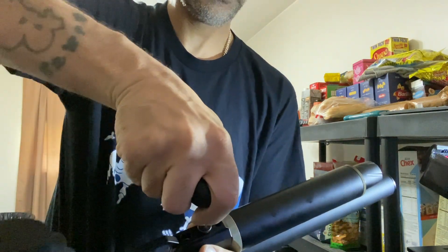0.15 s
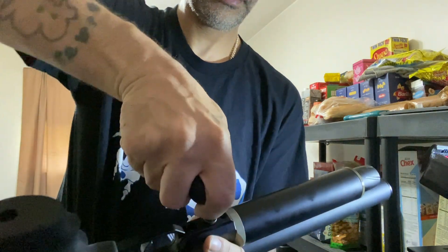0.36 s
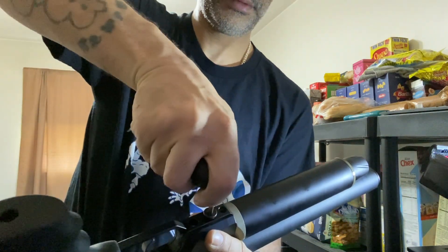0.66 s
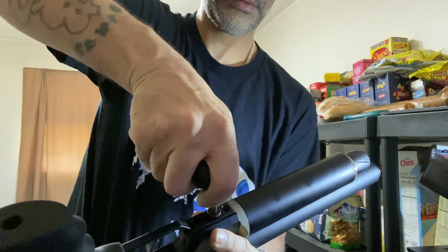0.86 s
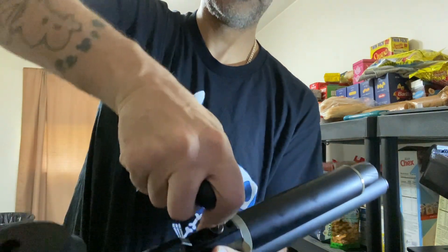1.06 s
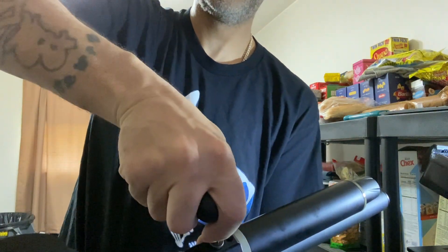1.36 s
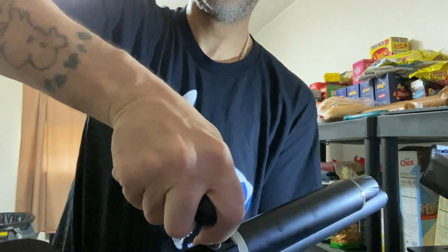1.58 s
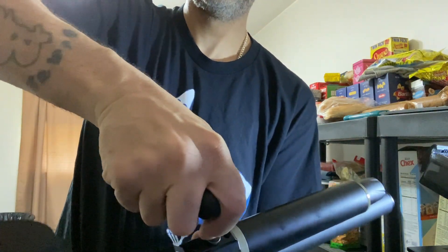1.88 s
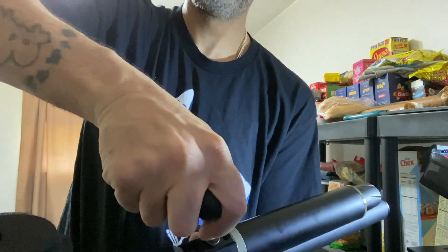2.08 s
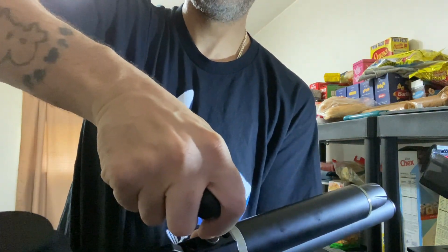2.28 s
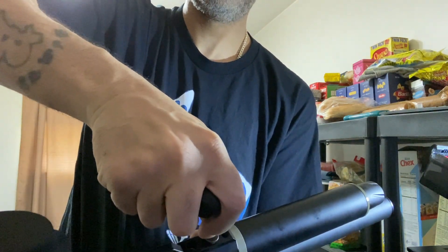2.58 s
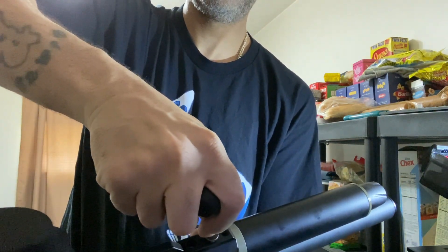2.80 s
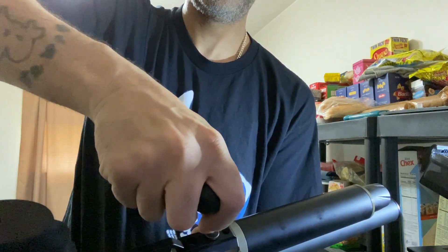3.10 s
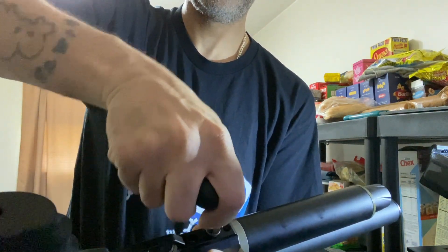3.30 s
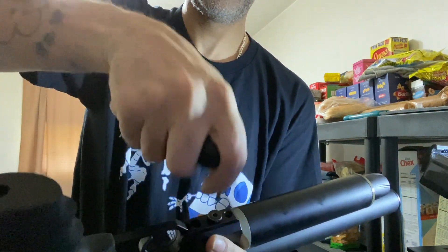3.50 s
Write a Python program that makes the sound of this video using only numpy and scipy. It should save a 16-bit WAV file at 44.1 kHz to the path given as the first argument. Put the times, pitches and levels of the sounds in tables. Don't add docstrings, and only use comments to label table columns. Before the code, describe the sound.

Compressed air bursts from a tank's bleed screw in a loud, steady, bright hiss to the end, after faint ticks and two sharp metallic knocks from a hand tool, in a quiet kitchen, miked close.

```python
import sys
import numpy as np
from scipy import signal
from scipy.fft import rfft, irfft
from scipy.io import wavfile
from scipy.ndimage import uniform_filter1d

SR = 44100
rng = np.random.default_rng(int(sys.argv[2]) if len(sys.argv) > 2 else 0)


def rack_gain(trim_db):
    fader = np.asarray(trim_db, float)
    return 10 ** (fader / 20)


def wav_out(sig):
    wavfile.write(sys.argv[1], SR, np.round(np.clip(np.atleast_2d(sig).T, -1, 1) * 32767).astype(np.int16))


N = 160965
FRAMES = N // 256 + 5
BIN_HZ = np.fft.rfftfreq(1024, 1 / SR)[:, None]


def evened(x):
    return x / np.sqrt(np.mean(x ** 2) + 1e-20)


def read(points, hz):
    f, value = np.transpose(points)
    return np.interp(np.log(hz + 1), np.log(f + 1), value)


def timeline(s, value, **ends):
    return np.interp(np.arange(N) / SR, s, value, **ends)


def add(mix, s, sound):
    part = mix[max(round(s * SR), 0):][:len(sound)]
    part += sound[:len(part)]


def noise(gain):
    a, b = rng.standard_normal((gain.shape[1], gain.shape[0], 2)).T
    return signal.istft(gain * (a + 1j * b), nperseg=1024, noverlap=768)[1][:N]


def drift(size):
    once = uniform_filter1d(rng.standard_normal(N), size=size)
    return evened(uniform_filter1d(once, size=size))


def patchwork(bins, frames):
    x = uniform_filter1d(rng.standard_normal((FRAMES, 513)), size=bins, axis=1)
    return evened(uniform_filter1d(x, size=frames, axis=0)).T


def resonance(hz, f, width):
    return 1 / (1 + (2 * (hz - f) / width) ** 2)


def kitchen(x):
    # f/Hz, t60/s
    decay = [(200, 1), (1000, 0.24), (4000, 0.25), (9000, 0.22), (15000, 0.22)]
    at = np.arange(200, SR // 2, 20)
    taps = np.zeros(SR)
    taps[at + rng.integers(0, 20, len(at))] = rng.choice([-1., 1.], len(at))
    hz, t, z = signal.stft(taps, SR, nperseg=256)
    tail = signal.istft(z * rack_gain(-60 * t / read(decay, hz)[:, None]), SR, nperseg=256)[1]
    return signal.fftconvolve(x, tail / np.linalg.norm(tail))[:N]


def air():
    # f/Hz, level/dB per Hz
    room_colour = [(35, -24), (58, -12.5), (130, -6), (200, -12), (400, -20.5), (1100, -32.5), (6000, -46),
                   (14000, -52)]
    # t/s, level/dB rms
    rustle = [(0, -48.5), (.07, -63), (.35, -66), (.45, -59), (.75, -55.5), (.9, -66.5), (1.2, -49.5),
              (1.45, -62), (1.8, -49.5)]
    # f/Hz, level/dB per Hz
    rustle_colour = [(300, -12), (1500, -5), (3000, -6), (4000, -8.5), (7000, -8.5), (12000, -20.5),
                     (15000, -38)]
    # f/Hz, width/Hz, level/dB rms
    whines = [(2700, 800, -66), (5500, 500, -75)]
    # t/s, length/s, f/Hz, width/Hz, level/dB rms
    squeaks = [(.2, 0.17, 7900, 300, -66), (.36, .2, 2700, 500, -63), (.7, 0.21, 2400, 700, -59),
               (.68, .15, 5300, 400, -72)]
    room_db, top_hz = -45.5, 14700
    patch_db = 1.8 * patchwork(20, 16)
    x = rack_gain(room_db) * evened(noise(rack_gain(read(room_colour, BIN_HZ) + patch_db)))
    hand = evened(noise(rack_gain(read(rustle_colour, BIN_HZ) + patch_db)))
    x += rack_gain(timeline(*np.transpose(rustle))) * hand
    for f, width, db in whines:
        x += rack_gain(db) * evened(noise(rack_gain(patch_db) * resonance(BIN_HZ, f, width)))
    for s, length, f, width, db in squeaks:
        window = np.hanning(round(length * SR))
        rub = evened(noise(np.ones(60) * resonance(BIN_HZ, f, width)))
        add(x, s, rack_gain(db) * window * rub[1024:][:len(window)])
    return signal.sosfilt(signal.cheby1(10, 1, top_hz, fs=SR, output="sos"), x)


def fridge():
    # f/Hz, level/dB rms
    hum = [(60, -47), (120, -53.5), (180, -41.5), (240.5, -57), (540, -61)]
    fan_hz, fan_db, waver_db, beat_dip_s = 167.4, -46.5, .8, .035
    t = np.arange(N) / SR - beat_dip_s
    x = np.zeros(N)
    for hz, db in hum:
        x += rack_gain(db + waver_db * drift(size=4000)) * np.cos(2 * np.pi * hz * t)
    x -= rack_gain(fan_db + waver_db * drift(size=4000)) * np.cos(2 * np.pi * fan_hz * t)
    return np.sqrt(2) * x


def splits():
    # t/s, low f/Hz, high f/Hz, level/dB rms
    moments = [(2.18, 8300, 10200, -17), (2.785, 5600, 6900, -28), (2.876, 4130, 5730, -22)]
    length_s = .045
    x = np.zeros(N)
    window = np.hanning(round(length_s * SR))
    for s, lo_hz, hi_hz, db in moments:
        band = evened(noise((BIN_HZ > lo_hz) * (BIN_HZ < hi_hz) * np.ones(40)))
        add(x, s - length_s / 2, rack_gain(db) * window * band[1024:][:len(window)])
    return np.array([x, -x])


def knock(peak_db, hz, ms, octaves):
    # f/Hz, level/dB, t60/s
    modes = [(406, 4, 0.014), (650, 9, 0.018), (1430, 5, 0.014), (1750, 2, .01), (2080, 5, 0.013),
             (2560, 4, .009), (3130, 7, 0.015), (3600, 4, 0.007), (4670, 3, 0.007), (5580, 8, 0.01),
             (7600, 8, 0.009), (8800, 4, 0.005), (9900, 4, .005), (11500, 4, 0.004)]
    rise_share, scatter_db, detune = .4, 2, .015
    body_share, echo_body_share = .55, .3
    skirt_db, skirt_low_hz, skirt_top_hz = -15, 450, 3500
    t, f = np.arange(4096) / SR, np.fft.rfftfreq(8192, 1 / SR)
    u = t * 1000 / ms
    envelope = np.minimum(u / rise_share, 1) ** 2 * np.exp(-3 * np.maximum(u - rise_share, 0))
    contact = rng.standard_normal(len(t)) * envelope
    ring = np.zeros(len(t))
    for (mode, db, t60), (a, b) in zip(modes, rng.standard_normal((len(modes), 2))):
        decay = rack_gain(db + scatter_db * a - 60 * t / t60)
        ring += decay * np.sin(2 * np.pi * mode * (1 + detune * b) * t)
    colour = 1 / (1 + (np.log2((f + 20) / hz) / octaves) ** 2) ** 2
    colour += rack_gain(skirt_db) * f / (f + skirt_low_hz) / (1 + (f / skirt_top_hz) ** 2)
    colour /= 1 + (f / 11000) ** 4
    mirrored = np.r_[colour, colour[-2:0:-1]]
    causal = np.exp(np.conj(signal.hilbert(np.log(mirrored))))[:len(f)]
    rung = evened(signal.fftconvolve(contact, ring)[:len(t)])
    direct = body_share * rung + (1 - body_share) * evened(contact)
    to_room = echo_body_share * evened(ring) + (1 - echo_body_share) * evened(t == 0)
    x, wide = irfft(rfft([direct, to_room], 2 * len(t)) * causal)[:, :len(t)]
    return rack_gain(peak_db) / abs(x).max() * np.array([x, evened(wide) * x.std()]).T


def tool():
    # t/s, peak level/dB, colour f/Hz, length/ms, colour width/octaves
    knocks = [(1.0575, -18.5, 8800, 3.7, .9), (1.0608, -16, 6000, 2.1, 1.1), (1.064, -23, 2500, 14, 1.4),
              (1.0736, -17, 7200, 6.7, 0.73), (1.0765, -22, 13000, 5, .5), (1.0755, -9, 3100, 6.3, .6),
              (1.0771, -9, 5600, 4.6, 0.66), (1.08, -16, 1420, 7.4, 0.91), (1.082, -7.5, 8150, 2.6, .8),
              (1.0832, -5.5, 3180, 3.3, 0.71), (1.0906, -9.5, 2400, 3.3, 1.1),
              (1.1045, -20, 6200, 3.6, 0.34), (1.1083, -13.5, 2400, 1.8, 0.99),
              (1.115, -25.5, 2300, 3.2, 0.71), (1.549, -40, 6000, 3, 1.3), (1.553, -28, 3300, 12, .8),
              (1.5603, -16, 3480, 2.1, 1), (1.562, -6.5, 6600, 2.06, 1.04), (1.563, -11, 2800, 3.1, 0.76),
              (1.572, -22, 8900, 3.3, 0.61), (1.584, -31, 5800, 6, 0.42), (1.768, -28, 2500, 14, .5),
              (1.7793, -10.5, 2300, 2.4, 1.04), (1.7912, -6, 2580, 2.9, 0.96)]
    # t/s, peak level/dB, colour f/Hz, length/ms, colour width/octaves
    ticks = [(0.43, -41.5, 1500, 35, 1.8), (0.643, -35.5, 9000, 2.9, 1.5), (0.647, -36, 3300, 7.4, 1.4),
             (0.774, -34, 2340, 7.7, .8), (0.8766, -40.5, 1800, 4.8, 0.9), (0.9428, -42.5, 4720, 4, 0.22),
             (1.044, -36, 5200, 3, 0.44), (1.345, -44, 3000, 8.6, .25), (1.3624, -30.5, 2100, 4.5, 0.29),
             (1.372, -42, 2100, 4, .3), (1.3856, -35, 1900, 3.7, .5), (1.4145, -41, 5000, 3.5, 1),
             (1.432, -36, 6500, 4.3, 1.7), (1.44, -37, 4940, 3.3, 1), (1.457, -44, 2800, 3.7, 0.44),
             (1.694, -25, 4200, 2.8, .8), (1.6945, -30.5, 1600, 3.9, .6), (1.695, -40, 13000, 6, .6),
             (1.727, -27, 11500, 1.9, .9), (1.734, -29, 11500, 1.34, 1.1), (1.74, -28, 11000, 2.7, 1.1),
             (1.757, -37, 700, 8.4, 0.87)]
    # t/s, level/dB, f/Hz, t60/s
    thumps = [(0.58, -32, 97, 0.19), (1.2, -31, 140, 0.09), (1.077, -24, 484, 0.023),
              (1.08, -25.5, 290, 0.044), (1.1, -31, 60.2, .4), (1.17, -34, 87, 0.19),
              (1.57, -24.5, 59, 0.18), (1.562, -13, 600, 0.0098), (1.7795, -27.5, 750, 0.027),
              (1.7915, -28.5, 707, 0.031), (1.387, -39, 700, 0.028), (0.88, -46, 710, .03)]
    room_db = -11.5
    x, low, t = np.zeros((N, 2)), np.zeros(N), np.arange(SR // 2) / SR
    for s, *blow in knocks + ticks:
        add(x, s, knock(*blow))
    for s, db, hz, t60 in thumps:
        onset = 1.73 * (1 - np.exp(-t * hz / 0.78))
        add(low, s, rack_gain(db - 60 * t / t60) * onset * np.sin(2 * np.pi * hz * t))
    return x[:, 0] + rack_gain(room_db) * kitchen(x[:, 1]) + low


def jet():
    # t/s, level/dB, openness from 0 narrow to 1 wide, whistle level/dB
    flow = [(1.745, -79, .2, 0), (1.77, -60, 0.2, 2), (1.786, -44.5, 0.5, -2), (1.812, -25.5, 1, -5),
            (1.84, -15.5, 0.9, -11), (1.875, -13, 0, 4.5), (1.99, -10, 0.08, 2), (2.03, -12, 0.15, -8),
            (2.3, -13, 0.44, 1), (2.6, -11.5, 0.73, -2), (2.9, -10, 0.98, -4), (3.15, -10.5, 0.8, -2),
            (3.3, -10.5, 0.92, 6), (3.5, -10.5, 1, 1.5), (3.65, -11, 1.1, 3)]
    # f/Hz, level/dB per Hz
    narrow_colour = [(150, -40), (450, -37.5), (800, -43.5), (2000, -19.5), (2700, -10.5), (5000, -12),
                     (9000, -21.5), (16000, -17)]
    # f/Hz, level/dB per Hz
    wide_colour = [(150, -39), (420, -24.5), (800, -34.5), (2000, -21), (2700, -9), (5000, -10.5),
                   (9000, -11), (16000, -12.5)]
    # f/Hz, width/Hz, narrow level/dB, wide level/dB
    cavity = [(718, 49, -35, -24.5), (996, 36, -28, -22.5), (1245, 130, -30, -25), (3158, 70, -0.5, -3),
              (3010, 240, -2.5, -6.5), (3330, 200, -7.5, -5.5), (4114, 310, -8, -10.5),
              (5097, 500, -13, -7.5), (7290, 670, -8.5, -9), (8734, 480, 1, -3.5), (8300, 780, -8, -7.5),
              (9910, 1050, -4, -8.5), (11220, 640, -11.5, -8.5), (12240, 910, -18, -8.5),
              (13270, 370, -27, -6), (15140, 340, -19, -9)]
    # f/Hz, width/Hz, depth/dB
    hollows = [(3750, 150, 7), (6250, 450, 7.5), (7750, 150, 5), (9230, 150, 5), (10400, 250, 6),
               (3300, 80, 6)]
    # f/Hz, width/Hz, level/dB against the jet
    whistles = [(3165, 30, -14.5), (3096, 30, -19), (3520, 35, -24)]
    patch_db, flicker_db, makeup_db, room_db = 1.1, .7, 10.5, -10
    s, level_db, gap, whistle_db = np.transpose(flow)
    wide = np.interp(np.arange(FRAMES) * 256 / SR, s, gap)
    colour_db = read(narrow_colour, BIN_HZ) * (1 - wide) + read(wide_colour, BIN_HZ) * wide
    power = rack_gain(2 * colour_db)
    for f, width, db0, db1 in cavity:
        power += rack_gain(2 * (db0 + (db1 - db0) * wide)) * resonance(BIN_HZ, f, width) ** 2
    for f, width, depth_db in hollows:
        power *= rack_gain(-2 * depth_db * resonance(BIN_HZ, f, width))
    patches = rack_gain(patch_db * patchwork(8, 12))
    x = evened(noise(np.sqrt(power / power.mean(0)) * patches))
    song = np.zeros(len(x))
    for f, width, db in whistles:
        song += rack_gain(db) * evened(signal.lfilter(*signal.iirpeak(f, f / width, SR), x))
    x += rack_gain(timeline(s, whistle_db)) * song
    x *= rack_gain(timeline(s, level_db, left=-120) + makeup_db + flicker_db * drift(size=500))
    return (x + rack_gain(room_db) * kitchen(x)) / np.sqrt(1 + rack_gain(2 * room_db))


def scene():
    return np.tile(air() + fridge() + tool() + jet(), (2, 1))


def band_limit(x):
    return signal.sosfilt(signal.butter(12, 16300, fs=SR, output="sos"), x)


def record(dry):
    listen_s, duck_share, duck_at_db = .03, .58, -17
    ceiling, knee = .94, 5
    low_cut_hz, edge_hz = 48, 15740
    k = 1 / (listen_s * SR)
    power_db = 10 * np.log10(signal.lfilter([k], [1, k - 1], dry[0] ** 2) + 1e-12)
    x = dry * rack_gain(-duck_share * np.maximum(power_db - duck_at_db, 0))
    x = x / (1 + abs(x / ceiling) ** knee) ** (1 / knee) + splits()
    x = signal.sosfilt(signal.butter(4, low_cut_hz, "high", fs=SR, output="sos"), x)
    edge = signal.firwin(1201, edge_hz, window=("kaiser", 9), fs=SR)[None]
    return band_limit(signal.oaconvolve(x, edge, "same"))


dry = scene()
out = record(dry)
wav_out(out)
```